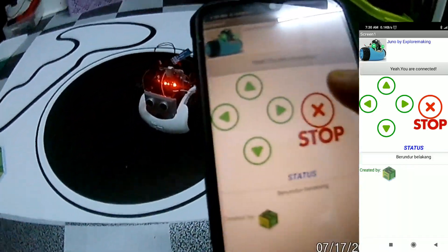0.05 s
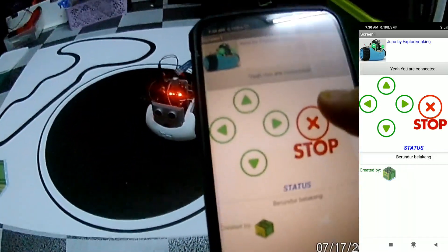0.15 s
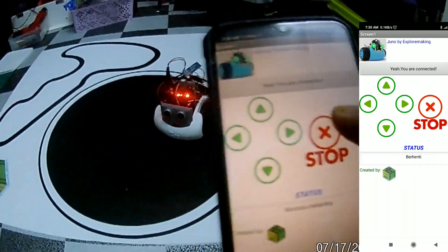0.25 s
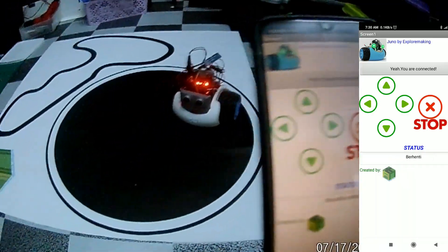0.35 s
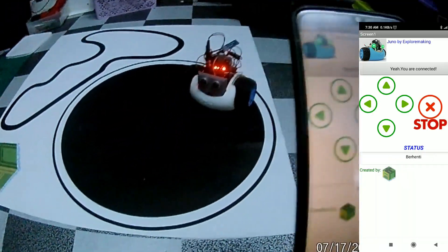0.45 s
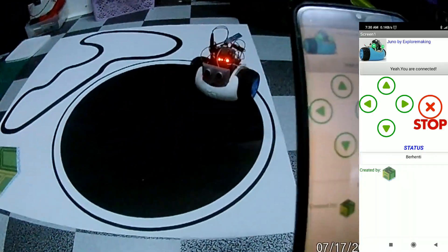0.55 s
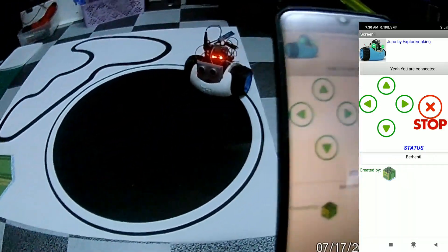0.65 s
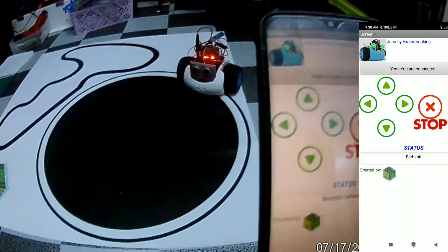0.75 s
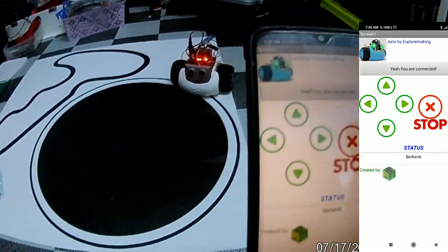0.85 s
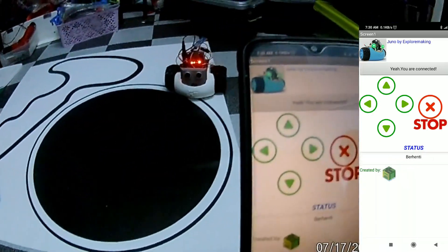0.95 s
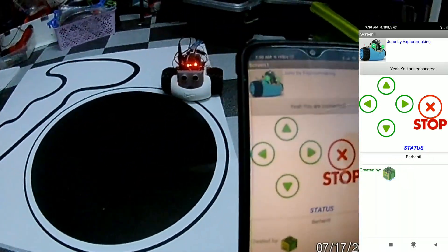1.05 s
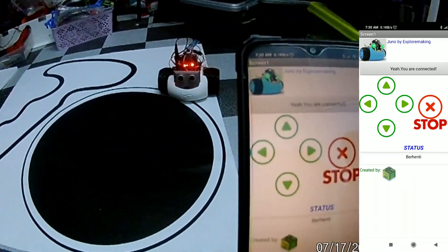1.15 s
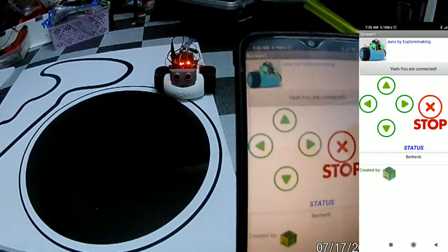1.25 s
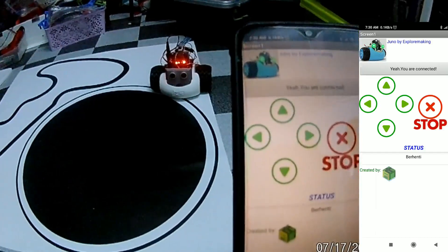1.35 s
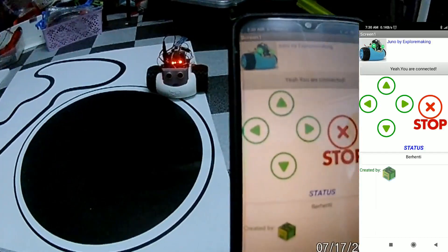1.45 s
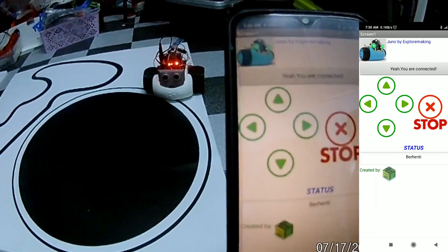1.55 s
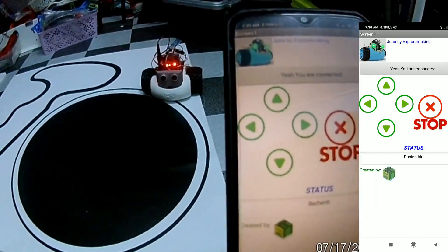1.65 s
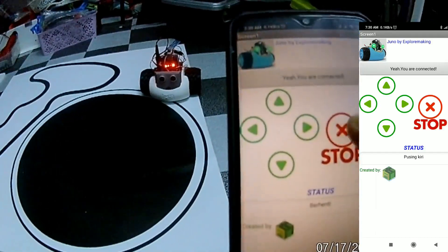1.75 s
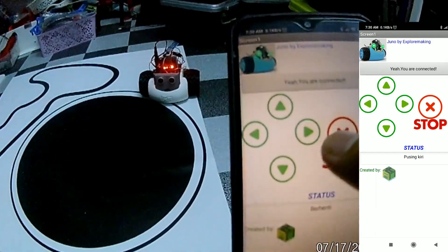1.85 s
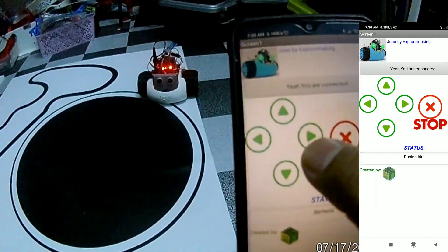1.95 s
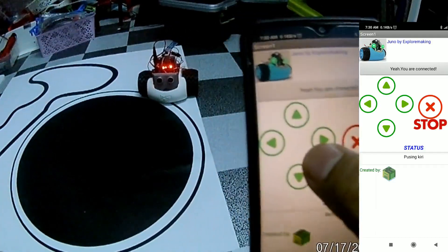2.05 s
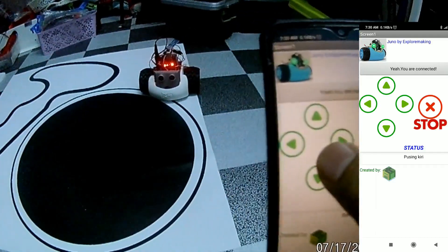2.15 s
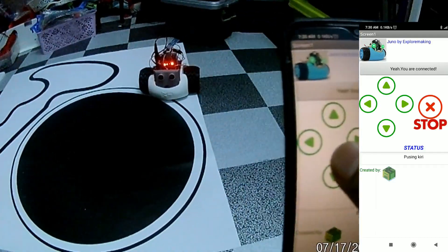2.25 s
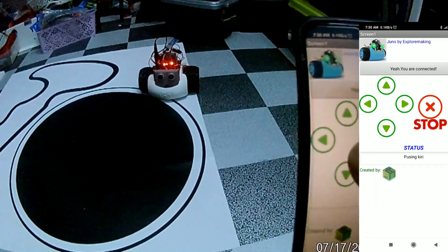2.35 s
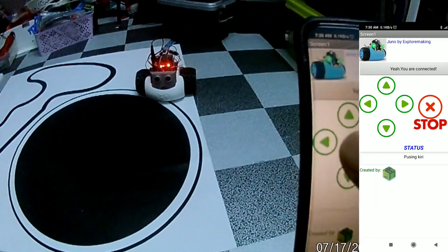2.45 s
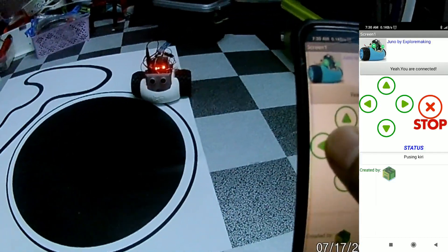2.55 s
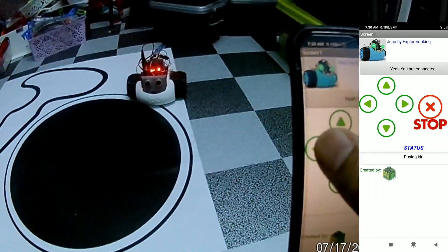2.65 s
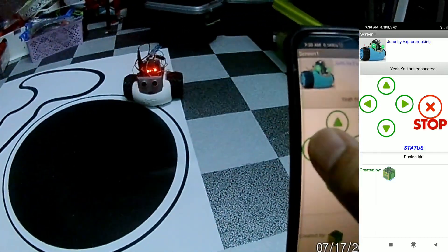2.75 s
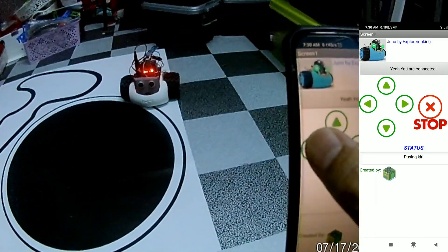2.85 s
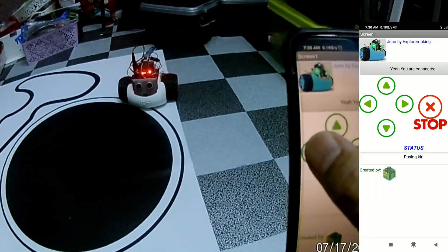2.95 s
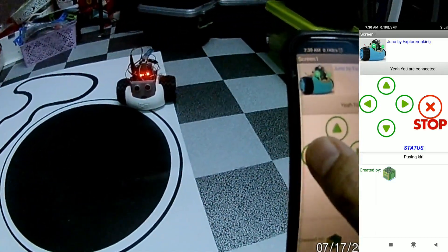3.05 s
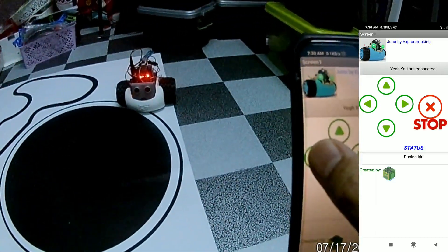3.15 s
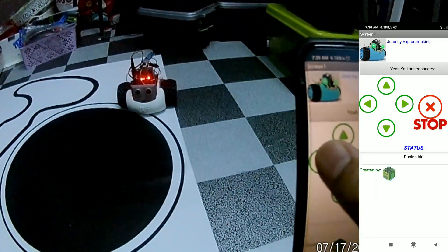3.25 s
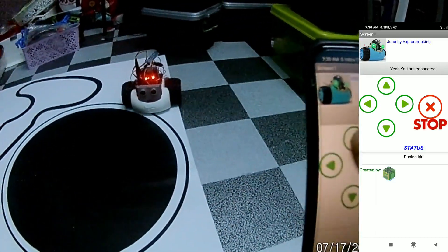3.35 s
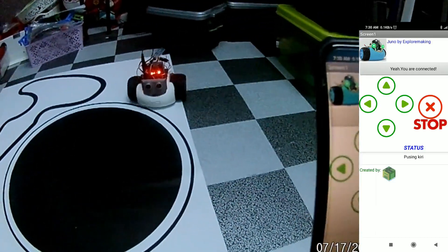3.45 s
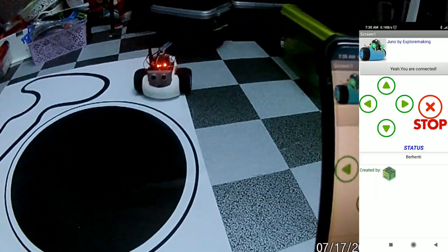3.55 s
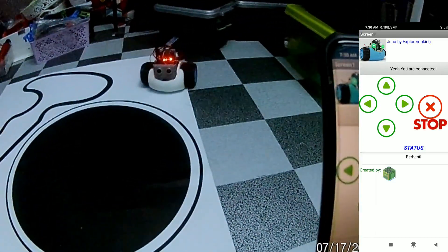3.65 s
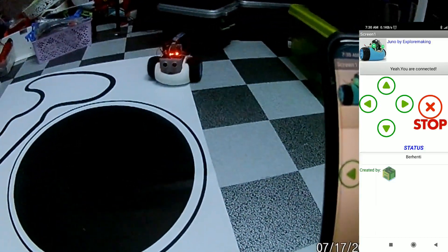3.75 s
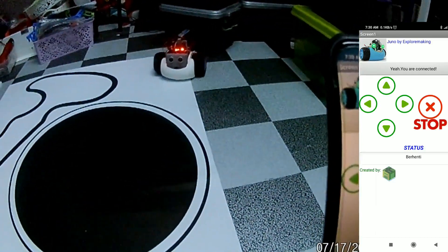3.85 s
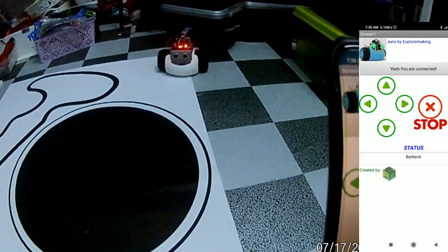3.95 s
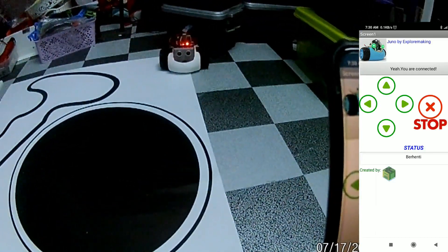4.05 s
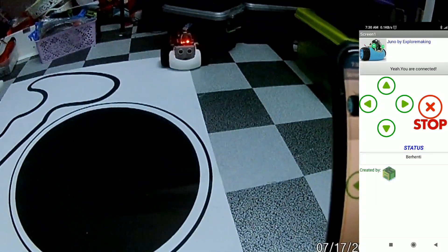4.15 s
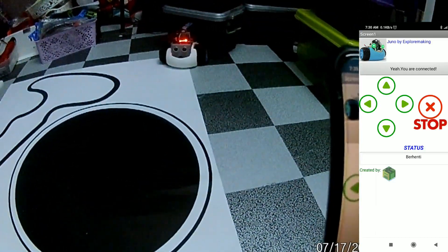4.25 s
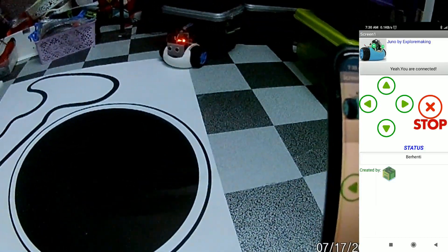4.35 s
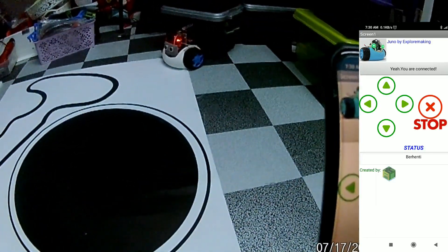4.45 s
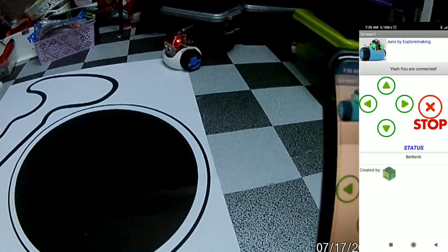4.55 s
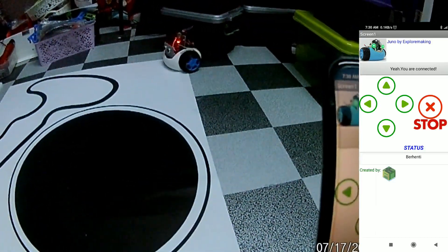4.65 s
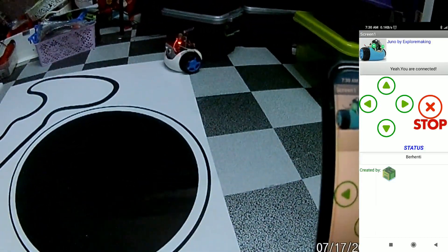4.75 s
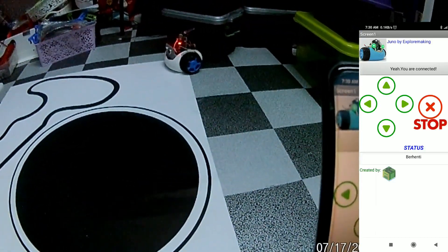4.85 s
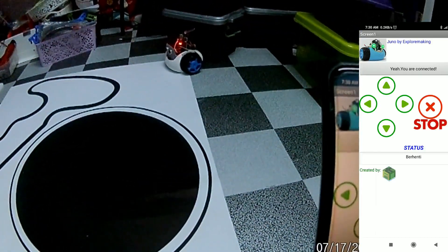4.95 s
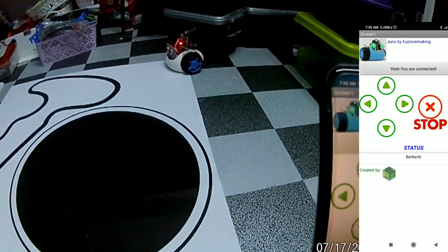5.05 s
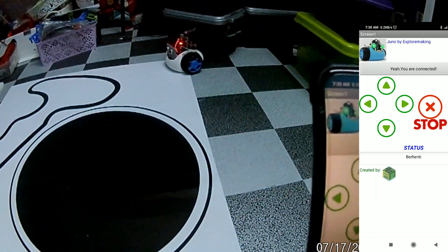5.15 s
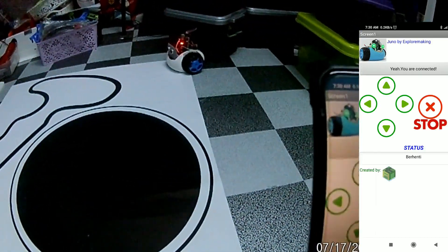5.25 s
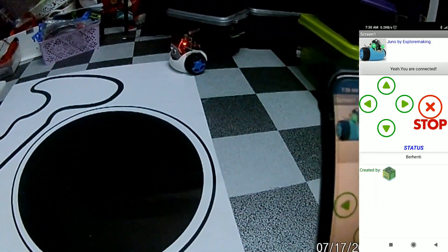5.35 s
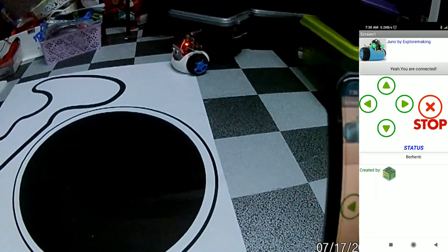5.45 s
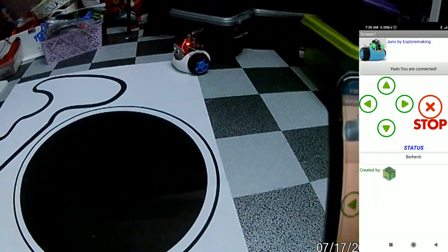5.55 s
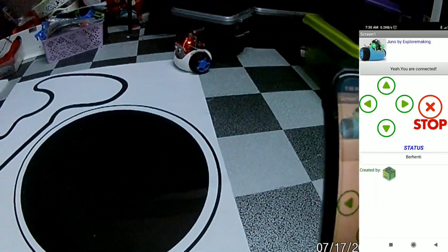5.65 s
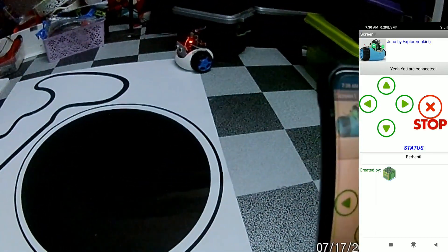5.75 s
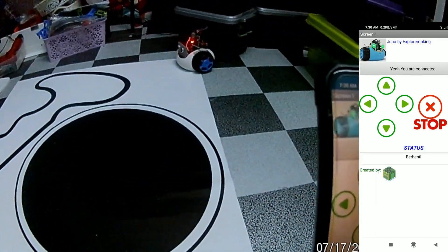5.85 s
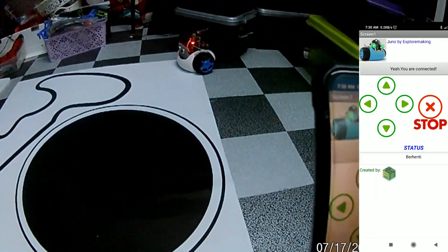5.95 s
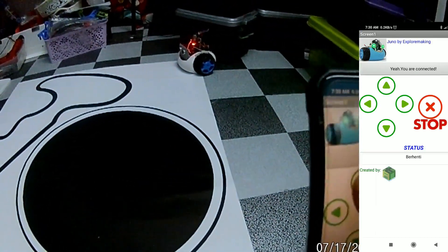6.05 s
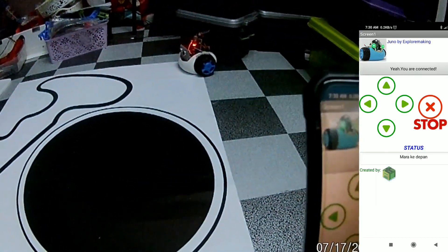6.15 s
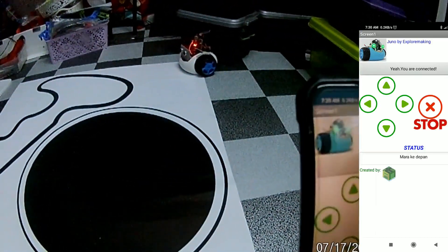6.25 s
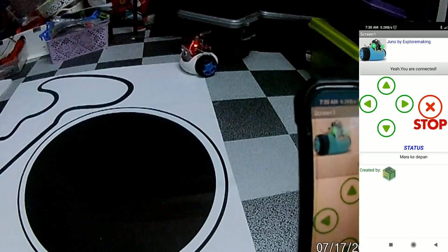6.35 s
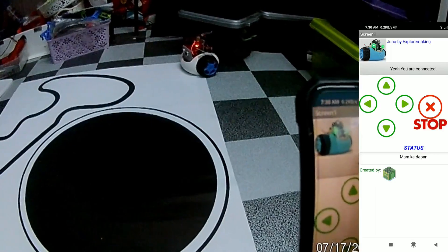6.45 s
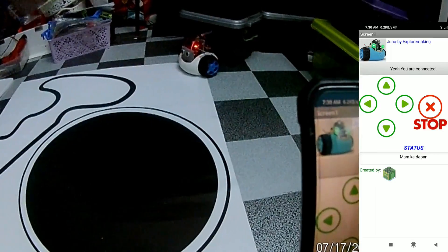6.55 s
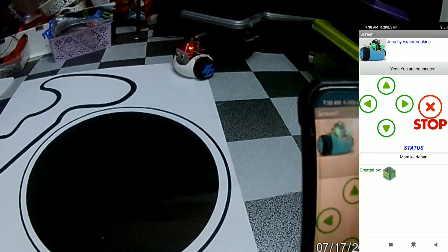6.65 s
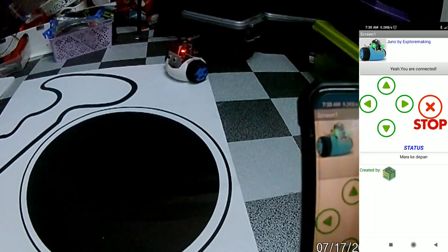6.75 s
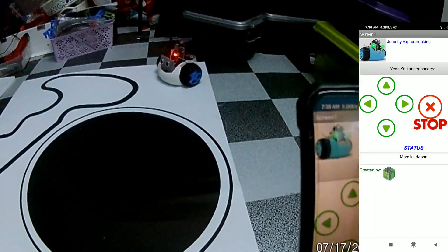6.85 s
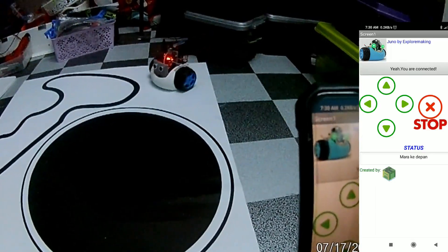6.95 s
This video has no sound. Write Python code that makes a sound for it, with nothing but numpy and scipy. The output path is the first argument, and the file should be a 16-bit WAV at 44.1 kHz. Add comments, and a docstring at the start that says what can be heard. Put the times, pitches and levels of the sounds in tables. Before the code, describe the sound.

A small robot car with plastic gears drives on a tabletop mat in a quiet room. From 0 to 1.0 s it is already running: bright, dry gear hiss with tiny chirps over two wavering motor whines, one sagging around 0.2 s and again near 0.85 s, with raspy tooth catches. It coasts out abruptly, leaving soft air and a low unsteady hum. At about 3.3 s it bites again, a dull version slightly ahead of the bright one, and whirs until 4.8 s; from 4.0 s one motor slows, judders and squeals through a turn, with a hollow knock and table boom near 4.3 s and scrapes before the stop. Quiet returns, with a faint tick at 6.06 s. Near 6.2 s the third run starts, coarse with rapid scraping catches, knocks around 6.75 s, and whirs on to the end at about 7 s, over a growing low rumble.

```python
"""Plastic gears hiss and chatter over two whining motors as a small robot car drives on a tabletop mat: three
runs, the first under way at the start and the last at the end. Hiss is shaped noise with short chirps; motors
are wavering multiples of a pinion rate, one slowing and squealing in the turns; catching teeth and chassis
knocks ring modes. A dull microphone is mixed a moment ahead of a bright one, in a quiet room with a low hum."""
import sys
import numpy as np
from scipy import signal
from scipy.fft import rfft, irfft
from scipy.io import wavfile
from scipy.ndimage import uniform_filter1d

SR = 44100
rng = np.random.default_rng(int(sys.argv[2]) if len(sys.argv) > 2 else 0)


def transcribe(u):
    """Save the signal u as a 16-bit wav file named by the first command-line argument.

    u: samples, shape (n,) or (channels, n), limited to [-1, 1]; the rate is SR.
    q: integer samples, one column per channel.
    """
    v = np.clip(np.atleast_2d(u).T, -1, 1)
    q = np.round(v * 32767).astype(np.int16)
    wavfile.write(sys.argv[1], SR, q)


N = 308700
LONG = N + SR // 5  # spare samples for the microphone lead

# Relative spectrum of the gear hiss. Each row: frequency in Hz, density in dB per Hz.
HISS = [(6300, -22), (6800, 0.5), (7350, 5.5), (8300, 4), (9100, 3), (9950, 1), (10900, -1), (12300, -8),
        (14100, -19.5), (15000, -34.5), (15600, -47)]
# Relative spectrum of the housing noise. Each row: frequency in Hz, density in dB per Hz.
HOUSING = [(2900, -19.5), (3550, -2.5), (4300, 0.5), (4800, 0.5), (5250, 3.5), (5750, 0.5), (6200, 2.5),
           (6700, 4), (7200, 4), (7900, -52.5)]
TEETH_SPECTRUM = HOUSING[:-2] + HISS[2:]  # both joined, without the edges where they meet


def gain_of(db):
    """Amplitude factor of a level in dB."""
    return 10 ** (np.asarray(db) / 20)


def evened(x):
    """Scales to rms 1."""
    return x / np.sqrt(np.mean(x ** 2) + 1e-20)


def read(points, hz):
    """Reads a table of (Hz, value) along log frequency."""
    f, value = np.transpose(points)
    return np.interp(np.log(hz + 1), np.log(f + 1), value)


def add(mix, s, sound):
    """Adds a sound into the mix at s seconds."""
    part = mix[round(s * SR):][:len(sound)]
    part += sound[:len(part)]


def columns(rows, length_s=None):
    """Reads a table at every sample from its first row on, holding its last row up to length_s."""
    s, *values = np.transpose(rows)
    t = np.arange(s[0], length_s or s[-1], 1 / SR)
    return [np.interp(t, s, v) for v in values]


def drift(count, hz):
    """Slow chance of rms 1, up to about hz: white noise through a double pole."""
    r = np.exp(-2 * np.pi * hz / SR)
    white = rng.standard_normal(count + SR // 2)
    settled = signal.lfilter([1], [1, -2 * r, r * r], white)[SR // 2:]
    return evened(settled)


def noise(spectrum, size, patchy_db, flicker_db):
    """Random short-time spectra with drifting patches and a flicker shared by all bins; rms 1."""
    frames, hz = 4 * LONG // size + 5, np.fft.rfftfreq(size, 1 / SR)
    real, imag, patches = rng.standard_normal((frames, len(hz), 3)).T
    patches = uniform_filter1d(patches, size=4, axis=0)
    patches = evened(uniform_filter1d(patches, size=7, axis=1))
    flicker = evened(uniform_filter1d(rng.standard_normal(frames), size=6))
    level_db = read(spectrum, hz)[:, None] + patchy_db * patches + flicker_db * flicker
    z = (real + 1j * imag) * gain_of(level_db)
    return evened(signal.istft(z, nperseg=size, noverlap=3 * size // 4)[1][:LONG])


def wavering(hz, width_hz, rough):
    """A tone on the curve hz, part steady and part narrow noise (rough 0-1)."""
    rough = np.clip(rough, 0, 1)
    fuzz = drift(len(hz), width_hz) + 1j * drift(len(hz), width_hz)
    turns = rng.random() + np.cumsum(hz) / SR
    return ((np.sqrt(2) * (1 - rough) + rough * fuzz) * np.exp(2j * np.pi * turns)).real


def chirps(per_s, glide):
    """Short gliding partials: teeth sing near a housing mode for a few hundredths of a second."""
    # Housing modes that single teeth set singing. Each row: frequency in Hz, spread in Hz.
    modes = np.array([(3700, 300), (5300, 450), (6000, 400), (6600, 400), (7300, 400), (8600, 600),
                      (10000, 500)])
    out = np.zeros(LONG)
    for when, mode, length, size, off, slope in rng.random((round(per_s * LONG / SR), 6)):
        hz, spread_hz = modes[int(mode * len(modes))]
        t = np.arange(0, 0.018 + 0.023 * length, 1 / SR)
        start_hz = hz + spread_hz * (2 * off - 1)
        pitch_hz = start_hz * (1 + glide * (2 * slope - 1) * t)
        level_db = read(TEETH_SPECTRUM, hz) - 2.5 * np.log(1 - size)  # a few stand out
        chirp = np.hanning(len(t)) * np.sin(2 * np.pi * np.cumsum(pitch_hz) / SR)
        add(out, when * (LONG / SR - .1), gain_of(level_db) * chirp)
    return evened(out)


def gears():
    """Tooth friction: hiss, chirps and housing follow the drive, the chassis only a share of its swings."""
    # Each row: start in s, power off in s, housing in dB above the hiss, chassis in dB above the hiss
    # at the usual level.
    runs = [(-.1, .98, -1, -7), (3.353, 4.83, -0.5, -7.5), (6.269, 7.5, 1, -7)]
    # Relative spectrum. Each row: frequency in Hz, density in dB per Hz.
    chassis_spectrum = [(250, -31.5), (450, -6.5), (800, -14.5), (1100, -1.5), (1500, -1.5), (1850, -1.5),
                        (2500, 2.5), (3200, 1), (3900, -22.5)]
    # Gear hiss while driving. Each row: time in s, level in dB.
    drive = [(0, -37.5), (.45, -38), (.5, -36.5), (.76, -40), (.83, -38.5), (.98, -41.5), (3.39, -46),
             (3.44, -42), (3.6, -39), (3.86, -44), (4.02, -40), (4.19, -42.5), (4.27, -38.5), (4.51, -42),
             (4.58, -39.5), (4.76, -43.5), (4.82, -42.5), (6.3, -49.5), (6.41, -42), (6.6, -45),
             (6.7, -39.5), (6.8, -45), (7, -41)]
    rise_s, rise_db, coast_db_per_s = 0.031, 38, 206.5  # gears bite at once, coast out after power off
    chassis_share, usual_db = 0.643, -42
    chassis_lead_s = .012  # the chassis takes the load before the teeth sing

    spectra = (HISS, HOUSING, chassis_spectrum)
    hiss, housing, chassis = [noise(part, size=512, patchy_db=1.4, flicker_db=.9) for part in spectra]
    song = gain_of(-4) * chirps(per_s=230, glide=2.2)
    t, out = np.arange(LONG) / SR, np.zeros(LONG)
    drive_db = columns(drive, LONG / SR + 1)[0][:LONG]
    for start, off, housing_db, chassis_db in runs:
        body_start = start - chassis_lead_s
        bite_db = -rise_db * np.clip(1 - (t - start) / rise_s, 0, 1)
        body_bite_db = -rise_db * np.clip(1 - (t - body_start) / rise_s, 0, 1)
        coast_db = -coast_db_per_s * np.maximum(t - off, 0)
        body_db = chassis_db + usual_db + chassis_share * (drive_db - usual_db) + body_bite_db
        teeth = gain_of(drive_db + bite_db) * (hiss + song + gain_of(housing_db) * housing)
        body = gain_of(body_db) * chassis
        out += (t > body_start) * gain_of(coast_db) * ((t > start) * teeth + body)
    return out


def tones():
    """Each motor whines on multiples of its pinion rate, juddering in pitch and level below free speed."""
    # The steering motor drags down and recovers in each turn. One table a run.
    # Each row: time in s, pinion in Hz and strain in dB, both before judder.
    steering = [
        [(0, 1290, -56), (.07, 1200, -50), (.16, 930, -41), (.2, 830, -41), (.26, 645, -44), (.35, 885, -47),
         (.39, 1190, -47), (.46, 1290, -53), (.65, 1320, -54), (.76, 1170, -54), (.81, 930, -42),
         (.84, 830, -36), (.89, 720, -48), (.91, 890, -43), (.945, 790, -42), (.97, 870, -45), (1.02, 850, -52)],
        [(3.5, 1190, -60), (3.6, 1225, -51), (3.75, 1300, -58), (3.9, 1285, -58), (3.95, 1180, -49),
         (4.01, 885, -40), (4.045, 740, -40), (4.085, 650, -49), (4.1, 910, -50), (4.13, 830, -45),
         (4.22, 1020, -47), (4.3, 930, -43), (4.36, 980, -52), (4.41, 850, -44), (4.5, 900, -55),
         (4.57, 835, -45), (4.65, 950, -48), (4.71, 840, -45), (4.86, 900, -52)],
        [(6.3, 900, -56), (6.7, 920, -51), (7, 1026, -51)],
    ]
    # The other motor. One table a run. Each row: time in s, pinion in Hz and strain in dB, before judder.
    steady = [
        [(0, 1290, -46), (.1, 1233, -50), (.29, 1116, -50.5), (.5, 1070, -56.5), (.76, 1196, -52.5),
         (.9, 1141, -50.5), (1.02, 1113, -61.5)],
        [(3.5, 1023, -52), (3.7, 1072, -54), (3.85, 1155, -56.5), (4.0, 1088, -60.5), (4.12, 1040, -52.5),
         (4.25, 1081, -53.5), (4.4, 1028, -56), (4.7, 998, -64)],
        [(6.3, 930, -53.5), (6.45, 1029, -60), (6.72, 1120, -65), (6.82, 1055, -54), (7, 1015, -59)],
    ]
    # Each row: multiple of the pinion, level in dB, dB gained from free speed to standstill,
    # width as a share of mean pitch, roughness 0-1.
    steering_orders = [(1, 5, -100, .01, .42), (3, 3, -38, .014, .45), (6, 2, 0, .03, .4),
                       (6.33, -1, 0, .03, .6), (9, -6, 0, .014, .7)]
    # Columns as in steering_orders.
    steady_orders = [(1, 0, 0, .011, .42), (4 / 3, -1.5, 0, .012, .5), (2, -11, 0, .01, .4),
                     (3, -8, 0, .012, .4), (6, -3, 0, .016, .6)]
    # What the body lets out of the motor tones. Each row: frequency in Hz, gain in dB.
    shell = [(750, -30), (950, -4), (1150, 0), (1600, 0), (2500, -3), (3500, 1), (5000, 2), (6000, -1),
             (7500, -4), (12000, -10)]
    free_hz, judder_share, judder_db, judder_hz = 1300, .05, 4, 22

    out = np.zeros(LONG)
    for motor, orders in ((steering, steering_orders), (steady, steady_orders)):
        for rows in motor:
            hz, db = columns(rows, LONG / SR - 1e-3 if rows is motor[-1] else None)
            drag = np.clip(1 - hz / free_hz, 0, 1)
            hz = hz * (1 + judder_share * drag * drift(len(hz), judder_hz))
            db = db + judder_db * drag * drift(len(hz), judder_hz)
            stack = np.zeros(len(hz))
            for k, order_db, slowed_db, share, rough in orders:
                level_db = order_db + slowed_db * drag + read(shell, k * hz)
                stack += gain_of(level_db) * wavering(k * hz, share * k * hz.mean(), rough)
            add(out, rows[0][0], gain_of(db) * stack * signal.windows.tukey(len(hz), .05))
    return out


def room(x):
    """Sparse reflections of random sign, each band dying at its own speed."""
    # Each row: frequency in Hz, decay time over 60 dB in s.
    room_t60 = [(500, 0.43), (1500, 0.26), (4000, 0.35), (10000, 0.24)]
    room_db = -10
    taps = np.zeros(SR // 2)
    at = np.arange(300, len(taps) - 20, 20)
    taps[at + rng.integers(0, 20, len(at))] = rng.choice([-1., 1.], len(at))
    hz, t, z = signal.stft(taps, SR, nperseg=256)
    decay = gain_of(-60 * t / read(room_t60, hz)[:, None])
    tail = signal.istft(z * decay, SR, nperseg=256)[1]
    return x + gain_of(room_db) * signal.fftconvolve(x, tail / np.linalg.norm(tail))[:len(x)]


def background():
    """Room air as shaped noise, a low rumble, and a hum of wavering lines that swells slowly."""
    # Relative spectrum. Each row: frequency in Hz, density in dB per Hz.
    air_spectrum = [(20, -21), (40, -5.5), (58, -18.5), (90, -9), (135, -12), (200, -10), (297, -17.5),
                    (560, -20.5), (1210, -27), (2930, -41), (5000, -45.5), (7930, -50.5), (15600, -49.5)]
    # Each row: time in s, level in dB.
    low_rumble = [(0, -62), (1, -76), (3, -69), (6.4, -53.5)]
    # Each row: frequency in Hz, width in Hz, level in dB before the swell, roughness 0-1.
    hum_lines = [(73.8, 1.1, -61, 0.9), (108.7, 4.8, -53.5, 0.86), (123.3, 0.28, -50, 0.45),
                 (149.4, 2.5, -60, .7), (162.8, 1.1, -71.5, 1), (187.7, 1.7, -60.5, 0.3),
                 (223, 7.2, -62, 0.7)]
    # Each row: time in s, gain in dB.
    hum_swell = [(0, 4.5), (1, 0.5), (5, 1), (7, -6)]
    air_db = -61.5  # rms above 250 Hz

    t = np.arange(N) / SR
    air = noise(air_spectrum, size=2048, patchy_db=1.6, flicker_db=0.57)[:N]
    above = signal.sosfilt(signal.butter(4, 250, "high", fs=SR, output="sos"), air)
    air = air * gain_of(air_db) / above.std()
    hum = sum(gain_of(db) * wavering(np.full(N, hz), width_hz, rough)
              for hz, width_hz, db, rough in hum_lines)
    swell_s, swell_db = np.transpose(hum_swell)
    hum = hum * gain_of(np.interp(t, swell_s, swell_db))
    rumble_s, rumble_db = np.transpose(low_rumble)
    rumble = wavering(np.full(N, 56.), width_hz=8.1, rough=0.73)
    rumble = rumble * gain_of(np.interp(t, rumble_s, rumble_db))
    return rumble + air + hum


def catches():
    """A tooth catches: a short scrape that rings one housing mode and a shared high one, and hisses."""
    # Each row: start in s, level in dB, ring in Hz.
    caught_teeth = [(0.02, -42, 5230), (0.293, -33, 7000), (0.3624, -32, 6550), (0.428, -34, 6740),
                    (0.486, -34, 6620), (0.6997, -33, 6580), (0.7882, -33.5, 6830), (1.06, -47, 5350),
                    (3.3876, -43, 4870), (3.4327, -41, 4940), (3.475, -34, 5180), (3.537, -35.5, 5450),
                    (3.598, -45, 6700), (3.72, -40, 9270), (3.8765, -54, 7540), (4.2697, -34.5, 9940),
                    (4.688, -34, 7420), (4.745, -36, 5810), (4.77, -33, 5370), (4.786, -35, 7300),
                    (4.806, -34, 5440), (6.2943, -37.5, 6060), (6.3189, -31, 6120), (6.359, -32, 5520),
                    (6.42, -34.5, 7200), (6.4694, -39, 7340), (6.5035, -41, 9990), (6.544, -40, 5820),
                    (6.61, -35, 5430), (6.658, -38.5, 7550), (6.6937, -39, 5550), (6.7306, -34, 5920)]
    top_hz, top_db = 10200, -4
    out, t = np.zeros(LONG), np.arange(0, .04, 1 / SR)
    shape = (t / .01 * np.exp(1 - t / .01)) ** 4  # peaks at 10 ms
    scrape = noise(TEETH_SPECTRUM, size=256, patchy_db=3, flicker_db=0)
    for s, db, hz in caught_teeth:
        ring = wavering(np.full(len(t), hz), width_hz=220, rough=.9)
        top = gain_of(top_db) * wavering(np.full(len(t), top_hz), width_hz=350, rough=.9)
        hiss = 0.5 * scrape[round(s * SR):][:len(t)]
        add(out, s, gain_of(db) * shape * (ring + top + hiss))
    return out


def knocks():
    """The chassis drops on the mat and rings decaying modes; the table booms and rattles with each drop."""
    # Each row: start in s, level in dB, pitch factor, table boom in dB above the knock.
    drops = [(.55, -53, 0.94, -20), (.853, -47, 1.1, -21), (3.401, -42.5, 1.01, -5), (3.559, -53, 0.95, -5),
             (3.642, -47.5, 0.92, -25), (3.911, -50, 1.03, -10), (4.047, -44.5, 1.12, -10),
             (4.289, -36.5, 1.13, 1), (4.322, -45, 1.1, -1), (4.35, -51, 1.4, 6.5),
             (4.855, -41.5, 0.96, -9.5), (6.58, -46.5, 1, 0.5), (6.726, -41.5, 1.14, -7.5),
             (6.761, -36, 1.04, -13.5), (6.932, -47, 0.92, -22)]
    # Each row: frequency in Hz before the pitch factor, relative level in dB, decay time over 60 dB in s.
    knock_modes = [(350, -21.5, 0.02), (524, 4.5, 0.042), (643, -14.5, 0.046), (1004, -6, .03),
                   (2015, -21, .02)]
    boom_hz, boom_t60_s = 235, .16
    out, t = np.zeros(LONG), np.arange(0, .3, 1 / SR)
    band = signal.butter(2, [250, 1100], "band", fs=SR, output="sos")
    rattles = evened(signal.sosfilt(band, rng.standard_normal((len(drops), len(t)))))
    for (s, db, pitch, boom_db), rattle in zip(drops, rattles):
        ring = sum(gain_of(mode_db - 60 * t / t60_s) * np.sin(2 * np.pi * hz * pitch * t)
                   for hz, mode_db, t60_s in knock_modes)
        boom = np.sin(2 * np.pi * boom_hz * t) + 0.83 * rattle
        boom = boom * gain_of(boom_db - 60 * t / boom_t60_s)
        ring_onset, boom_onset = 1 - np.exp(-t / 0.00043), 1 - np.exp(-t / .003)
        add(out, s, gain_of(db) * (ring * ring_onset + boom * boom_onset))
    return out


def tick():
    """A faint tick near the dull microphone: a few milliseconds of bright noise, band-limited."""
    # Each row: start in s, level in dB.
    faint_ticks = [(6.058, -48)]
    out, band = np.zeros(N), signal.butter(8, [900, 7100], "band", fs=SR, output="sos")
    for s, db in faint_ticks:
        bright = signal.lfilter([1, -.7], [1], rng.standard_normal(300))
        burst = bright * signal.windows.hann(300) ** 2
        add(out, s, gain_of(db) * signal.sosfilt(band, burst))
    return out


def dull_microphone(car):
    """Hears the car a moment ahead of the bright microphone, with the treble rolled off."""
    # Each row: frequency in Hz, gain in dB.
    response = [(200, 1.5), (600, 1.5), (1200, -0.5), (2100, -4.5), (2800, -9.5), (3100, -15), (5000, -17),
                (6800, -33.5), (7400, -38.5)]
    lead_s = .0826
    ahead = car[round(lead_s * SR):]
    gain = gain_of(read(response, np.fft.rfftfreq(len(ahead), 1 / SR)))
    return irfft(rfft(ahead) * gain, len(ahead))


def scene():
    """The car in the room through both microphones, plus tick and background, as one channel."""
    car = room(gears() + tones() + catches() + knocks())
    return (car[:N] + dull_microphone(car)[:N] + background() + tick())[None]


def record(dry):
    """Band limit: a linear-phase low-pass."""
    edge_hz = 15700
    lowpass = signal.firwin(1023, edge_hz, window=("kaiser", 9), fs=SR)
    return signal.oaconvolve(dry, lowpass[None], "same")


dry = scene()
out = record(dry)
transcribe(out)
```